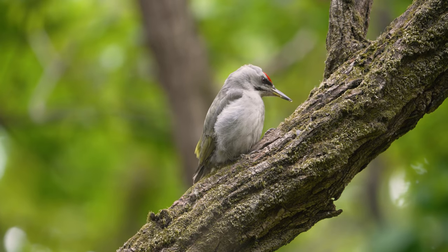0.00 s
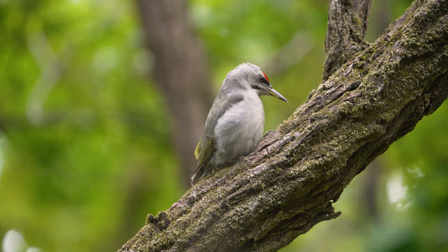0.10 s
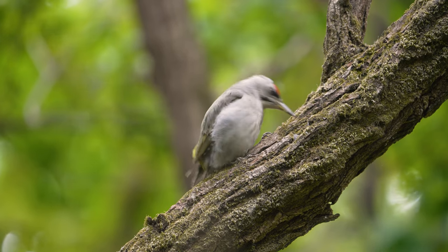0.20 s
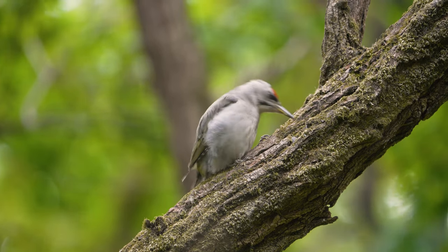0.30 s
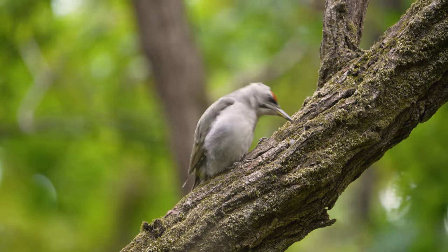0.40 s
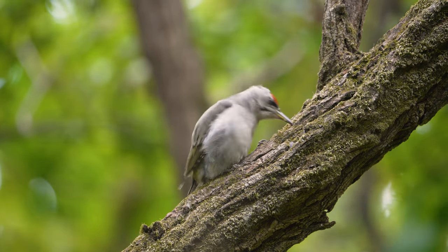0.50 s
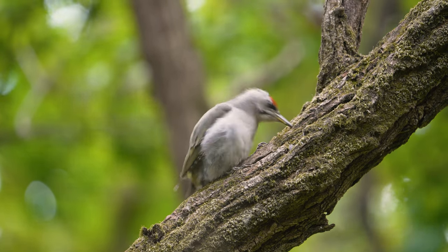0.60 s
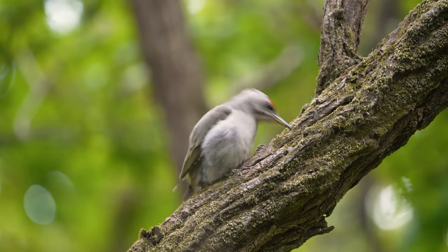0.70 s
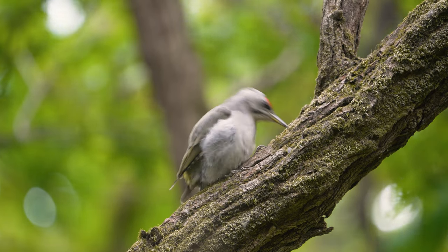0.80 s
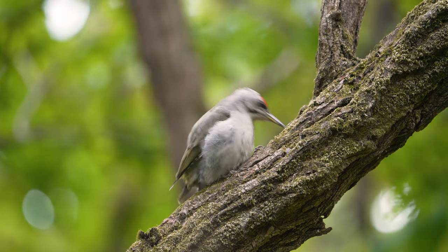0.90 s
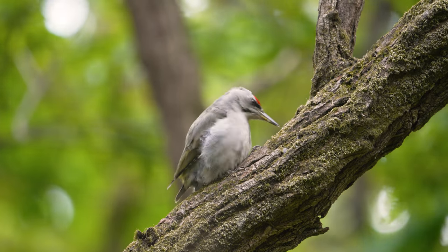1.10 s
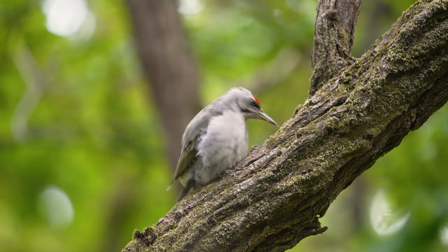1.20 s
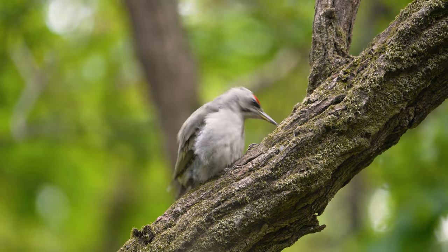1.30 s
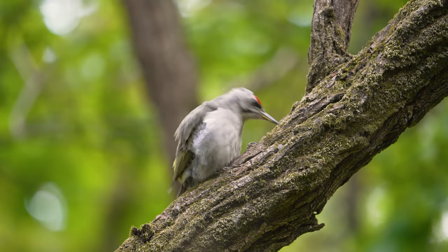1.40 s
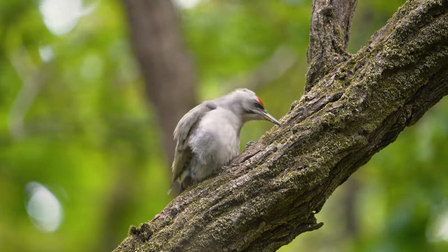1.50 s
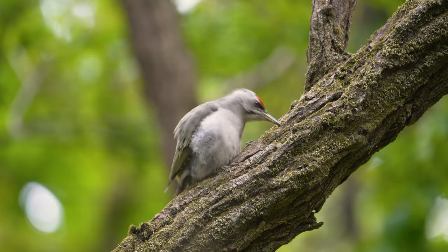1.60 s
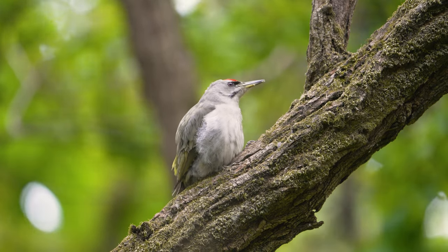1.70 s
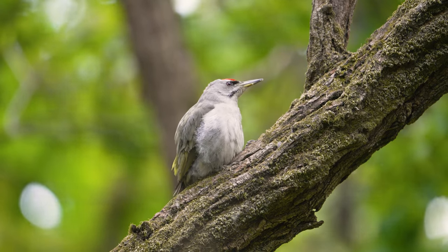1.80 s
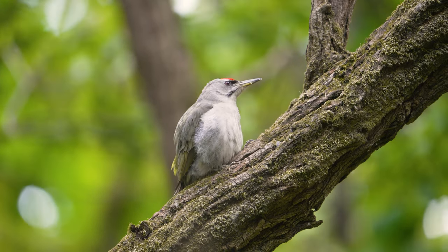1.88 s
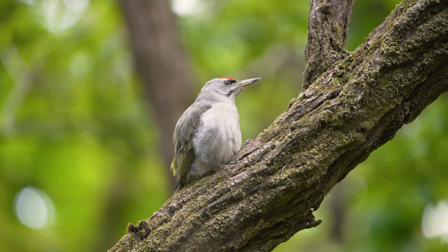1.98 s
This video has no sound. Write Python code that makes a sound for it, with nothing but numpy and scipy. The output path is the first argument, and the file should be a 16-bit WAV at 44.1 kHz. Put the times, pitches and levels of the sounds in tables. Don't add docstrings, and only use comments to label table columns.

```python
import sys
import numpy as np
from scipy import signal
from scipy.io import wavfile

SR = 44100
rng = np.random.default_rng(int(sys.argv[2]) if len(sys.argv) > 2 else 0)


def voltage_ratio(decibels):
    exponent = np.asarray(decibels, float) / 20
    return 10 ** exponent


def unload_wav(signal):
    wavfile.write(
        sys.argv[1],
        SR,
        np.round(np.clip(np.atleast_2d(signal).T, -1, 1) * 32767).astype(np.int16),
    )


N = 88200

# time in seconds, strength in dB, hardness (extra brightness) in dB.
BLOWS = [(0.2412, 2, 0), (0.2902, 0, 2), (0.3424, -0.0, -1.5), (0.3936, 1.3, 1.5), (0.4442, 1.1, 2.7),
         (0.4971, 0, 1.7), (0.549, 0.4, 0), (0.6004, 0.2, 0.0), (0.6525, 0.5, 1.5), (0.7042, -0.4, -1.0),
         (0.7557, 0.5, 2), (0.8073, 0.95, 0.5), (0.8581, 0.3, -0.5), (0.9101, 0.3, -1.5),
         (0.9611, 0.7, 0.5), (1.0132, 0.6, -0.5), (1.0659, 1.4, 1.7), (1.1182, 0.9, 1.7), (1.1704, 0.9, 2),
         (1.2214, 0.55, 2.5), (1.276, 0.5, 0.5), (1.3283, 0.6, 0.7), (1.3818, -0.2, 1.1),
         (1.4338, 0.5, 1.5), (1.4873, 0.5, 2.8), (1.5415, 0.9, 1.5), (1.5953, 1, 1.4), (1.6502, -0.5, 2),
         (1.7056, -3.5, 0.2)]


def rms_one(x):
    return x / np.sqrt(np.mean(x ** 2) + 1e-20)


def butter(x, hz, kind, order=2):
    return signal.sosfilt(signal.butter(order, hz, kind, fs=SR, output="sos"), x)


def drift(rate):
    step = 40
    r = np.exp(-2 * np.pi * rate * step / SR)
    chance = rng.standard_normal(N // step + 2002)
    slow = signal.lfilter([1], [1, -2 * r, r * r], chance)[2000:]
    return np.interp(np.arange(N) / step, np.arange(len(slow)), rms_one(slow))


def banded_noise(spectrum, patchy_db, flicker):
    hz, db = np.transpose(spectrum)
    edges = 20 * 2 ** np.arange(0, 10.1, 1 / 3)
    white = rng.standard_normal((2, N + SR))
    out = 0
    for k, (low, high) in enumerate(zip(edges, edges[1:])):
        log_middle = np.log(low * high) / 2
        level = np.interp(log_middle, np.log(hz), db, left=db[0] - 12, right=-90)
        band = butter(white[k % 2], [low, high], "band")[SR:]
        out = out + voltage_ratio(level + patchy_db * drift(flicker)) * band
    return rms_one(out)


def forest(x, t60, start_s):
    trees_per_s, rise_s = 3000, 0.012
    t = np.arange(SR) / SR - start_s
    trunks = (rng.random(SR) < trees_per_s / SR) * rng.standard_normal(SR)
    echoes = trunks * np.clip(t / rise_s, 0, 1) * voltage_ratio(-60 * t / t60)
    return signal.fftconvolve(x, echoes / np.sqrt(np.sum(echoes ** 2)))[:N]


def leaf_hiss():
    # pitch in Hz, level in dB per Hz.
    hiss_spectrum = [(200, -2.5), (420, -7), (1100, -10.5), (3000, -14), (5500, -23), (8000, -29),
                     (12000, -44.5), (17000, -42.5)]
    level_db = -44.5 - 0.94 * (np.arange(N) / SR - 0.5)
    return voltage_ratio(level_db) * banded_noise(hiss_spectrum, patchy_db=1.02, flicker=6.6)


def wind():
    # pitch in Hz, level in dB per Hz.
    wind_spectrum = [(12, -34), (20, 7.5), (64, 5.5), (162, -6.5), (200, -22), (260, -48.5), (440, -120)]
    # time in seconds, level of the wind in dB.
    gusts = [(0, -42.5), (.5, -46), (.95, -46.5), (1.1, -47.5), (1.3, -46.5), (1.6, -44), (2, -50)]
    # middle in seconds, level in dB, pitch in Hz, length in seconds.
    bumps = [
        (.31, -38, 75, .04),
        (1.172, -33, 72, .022),
        (1.165, -38, 145, .02),
        (1.4, -40, 60, .03),
        (1.41, -43, 125, .04),
        (1.52, -37, 62, .035),
    ]
    t = np.arange(N) / SR
    thumps = np.zeros(N)
    for middle, db, hz, length in bumps:
        swell = np.exp(-((t - middle) / length) ** 2)
        thumps += voltage_ratio(db) * swell * np.sin(2 * np.pi * hz * (middle - t))
    rumble = banded_noise(wind_spectrum, patchy_db=-0.7, flicker=6.9)
    return voltage_ratio(np.interp(t, *np.transpose(gusts))) * rumble + thumps


def unrest():
    # time in seconds, level in dB.
    unrest_level = [(0.0, -47), (0.24, -47), (0.55, -53.5), (0.79, -56.5), (1.16, -52.5), (2.0, -51.5)]
    chorus_hz, chorus_width_hz, rustle_hz = 3810, 900, 7440
    edges = [chorus_hz - chorus_width_hz / 2, chorus_hz + chorus_width_hz / 2]
    chorus = rms_one(butter(rng.standard_normal(N), edges, "band"))
    chorus = voltage_ratio(-2.5 + 2.0 * drift(9.2)) * chorus
    rustle = butter(rng.standard_normal(N), [rustle_hz, 1.5 * rustle_hz], "band", order=1)
    level_db = np.interp(np.arange(N) / SR, *np.transpose(unrest_level))
    return voltage_ratio(level_db) * (chorus + voltage_ratio(-21) * rms_one(rustle))


def songbirds():
    # start in seconds, length in seconds, then start, middle and end pitch in Hz.
    whistles = [
        (.035, .04, 3650, 3858, 3700),
        (0.114, 0.042, 3800, 4195, 3570),
        (0.167, .05, 3700, 4070, 4060),
        (1.04, .085, 3600, 4086, 3520),
        (1.126, 0.086, 3810, 4025, 3890),
        (1.77, .05, 4050, 4100, 4100),
        (1.872, 0.045, 4050, 3974, 4080),
        (1.892, .07, 4500, 4790, 4830),
        (1.986, 0.013, 3700, 3800, 3700),
    ]
    whistle_db = [-51, -50, -54, -43, -52, -57, -56, -58, -51]
    t = np.arange(N) / SR
    waver_hz = 30.7 * drift(67.0)
    flutter = voltage_ratio(3 * drift(33.0))
    out = 0
    for (start, length, hz0, hz1, hz2), db in zip(whistles, whistle_db):
        u = np.clip((t - start) / length, 0, 1)
        hz = np.interp(u, [0, .5, 1], [hz0, hz1, hz2]) + waver_hz
        swell = np.sqrt(2 * np.abs(np.sin(np.pi * u)))
        out = out + voltage_ratio(db) * swell * np.sin(2 * np.pi * np.cumsum(hz) / SR)
    return out * flutter


def twig():
    t = np.maximum(np.arange(N) / SR - 0.064, 0)
    snap = (t > 0) * np.exp(-t / .002) * rng.standard_normal(N)
    return voltage_ratio(-53) * butter(snap, 12000, "high")


def ring(clicks, hz, t60):
    r, w = voltage_ratio(-60 / (t60 * SR)), 2 * np.pi * hz / SR
    return signal.lfilter([0, np.sin(w)], [1, -2 * r * np.cos(w), r * r], clicks + 1e-18)


def branch_ringing(at):
    # pitch in Hz, level in dB, time to drop 60 dB in seconds, side of the swing (+1 or -1).
    modes = [(622, -20.6, .0207, -1), (724, -33, .06, 1), (804, -.9, .0177, -1), (857, -4.5, .063, 1),
             (946, -6.1, .0146, 1), (1198, -22, .033, 1), (1672, -8.8, .0087, 1), (1778, -6.3, .0105, -1),
             (2543, -19.9, .0142, 1), (2888, -18.3, .003, -1), (3824, -36.5, .012, -1),
             (4600, -38, .012, 1), (5220, -36, .014, 1), (6600, -44, .012, -1)]
    _, db, hard_db = np.transpose(BLOWS)
    wood = np.zeros(N)
    for hz, level_db, t60, side in modes:
        luck_db = 0.18 * rng.standard_normal(len(at))
        clicks = np.zeros(N)
        clicks[at] = voltage_ratio(db + level_db + hard_db * (hz > 2200) + luck_db)
        wood += np.sign(side) * ring(clicks, hz, t60)
    soft = np.exp(-2 * np.pi * 5380 / SR)
    wood = signal.lfilter([(1 - soft) ** 2], [1, -2 * soft, soft ** 2], wood)
    wood = butter(wood, 700, "high", order=4)
    return signal.lfilter(*signal.iirnotch(530, 5.5, fs=SR), wood)


def bill_ticks(at):
    crack_s, crack_hz = .002, 4500
    _, db, hard_db = np.transpose(BLOWS)
    clicks = np.zeros(N)
    clicks[at] = voltage_ratio(db + hard_db - 46 + 2.0 * rng.standard_normal(len(at)))
    clicks[at[0]] *= voltage_ratio(6.0)
    t = np.arange(SR // 50) / SR / crack_s
    tick = np.convolve(clicks, t * np.exp(1 - t))[:N] * rng.standard_normal(N)
    crack = butter(tick, [crack_hz / 4.0, crack_hz * 1.4], "band")
    return crack + voltage_ratio(-19) * butter(tick, 8000, "high")


def drumming():
    at = np.round(np.transpose(BLOWS)[0] * SR).astype(int)
    return branch_ringing(at) + bill_ticks(at)


def limb():
    s, db, _ = np.transpose(BLOWS)
    clicks = np.zeros(N)
    clicks[np.round(s * SR).astype(int)] = voltage_ratio(db + 5)
    return forest(butter(clicks, [1080, 1850], "band"), t60=0.33, start_s=0.00073)


def echoes(drum, birds):
    near_hz = 1350
    far_drum = voltage_ratio(-23) * forest(drum, t60=1.3, start_s=.026)
    middle = butter(butter(drum, near_hz / 0.88, "high"), near_hz * 1.77, "low")
    near_drum = voltage_ratio(-12) * forest(middle, t60=0.17, start_s=0.0034)
    bird_echo = voltage_ratio(-4.5) * forest(birds, t60=0.45, start_s=0.0013)
    return far_drum + near_drum + bird_echo


def scene():
    background = leaf_hiss() + wind() + unrest() + twig()
    birds = songbirds()
    drum = drumming()
    return (background + birds + drum + limb() + echoes(drum, birds))[None]


def roll_off(x):
    return signal.sosfilt(signal.butter(12, 16270, fs=SR, output="sos"), x)


def record(dry):
    mix = signal.sosfilt(signal.cheby2(10, 50, 16600, fs=SR, output="sos"), dry)
    return roll_off(mix)


dry = scene()
out = record(dry)
unload_wav(out)
```